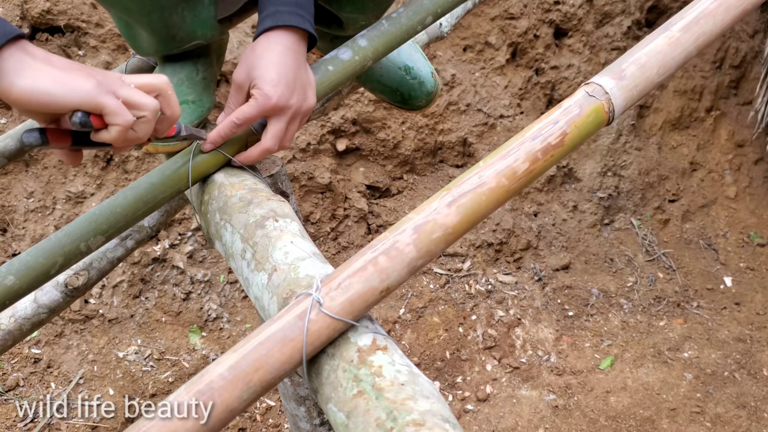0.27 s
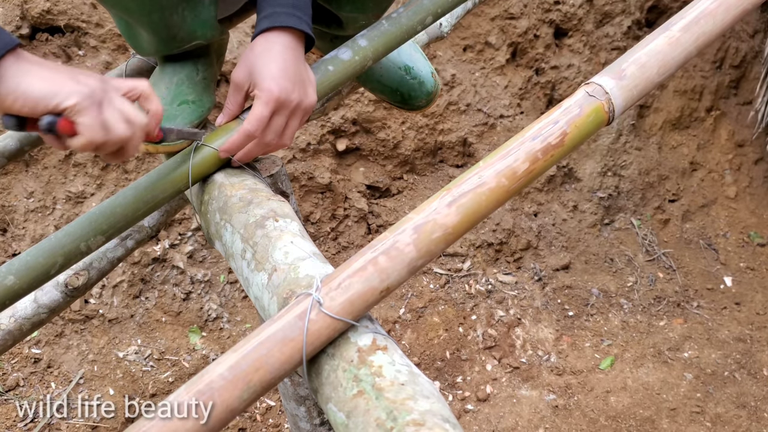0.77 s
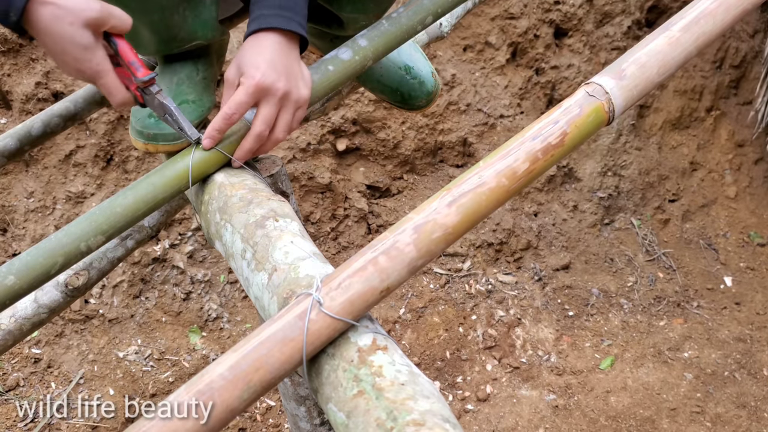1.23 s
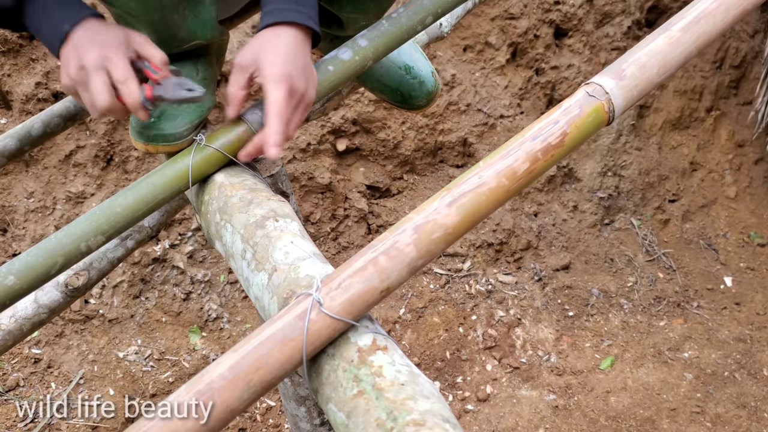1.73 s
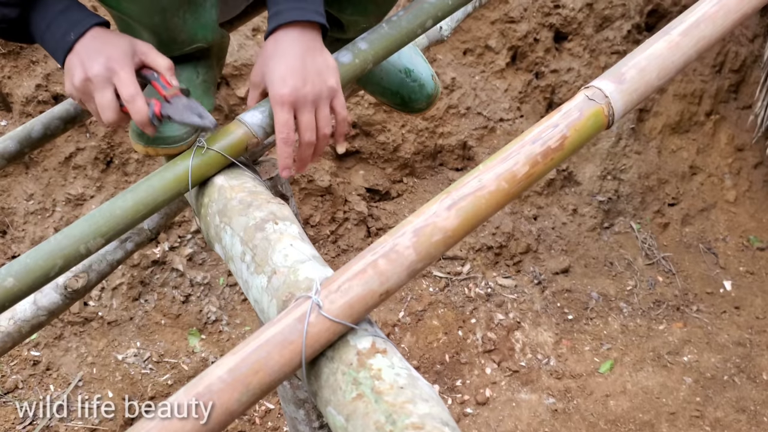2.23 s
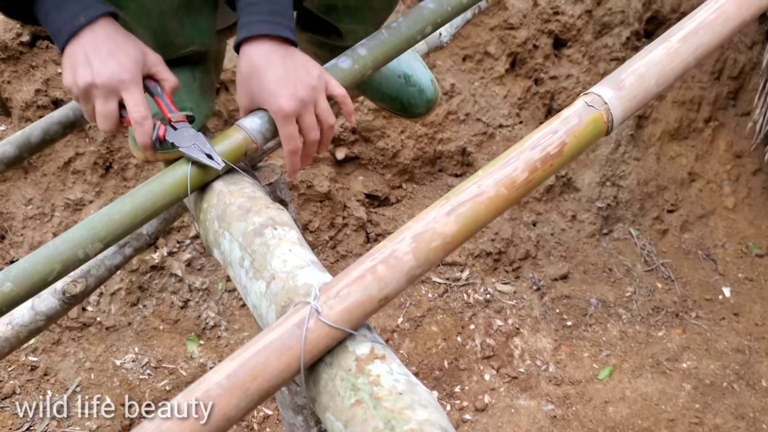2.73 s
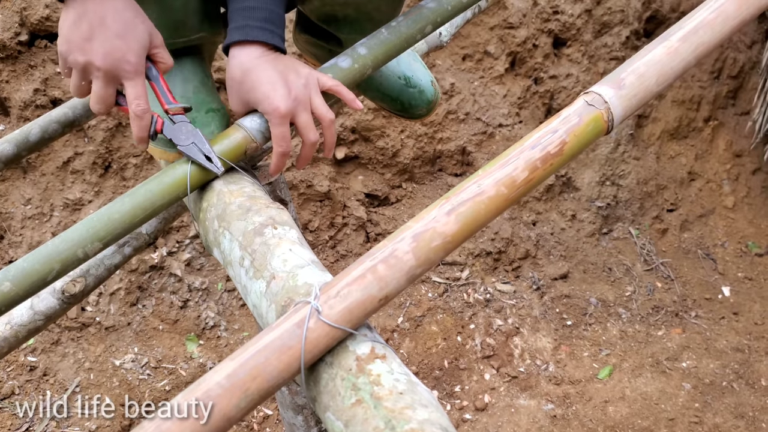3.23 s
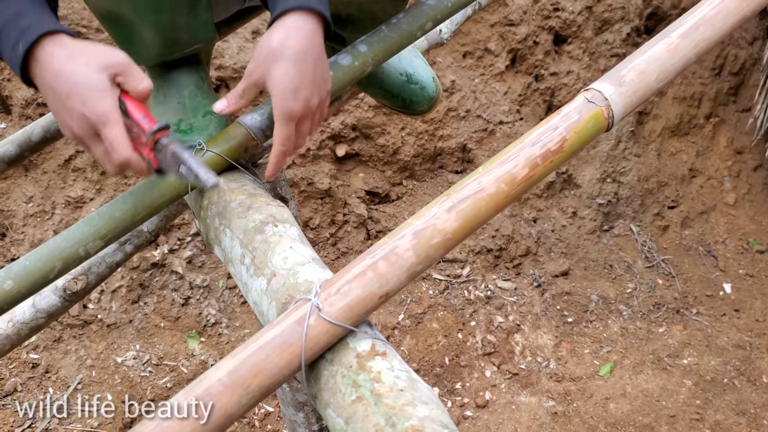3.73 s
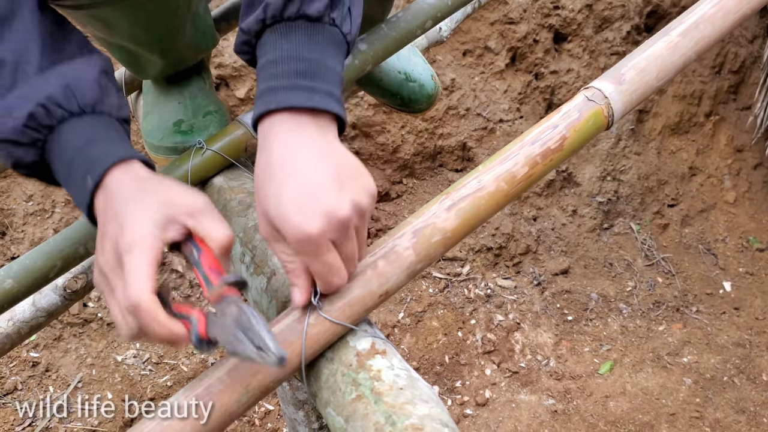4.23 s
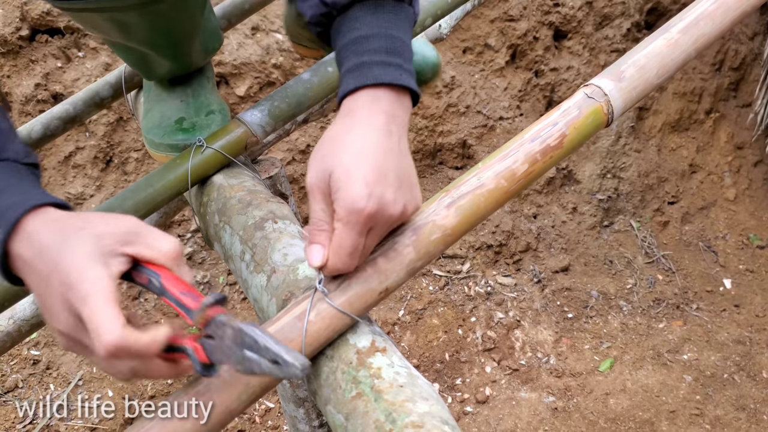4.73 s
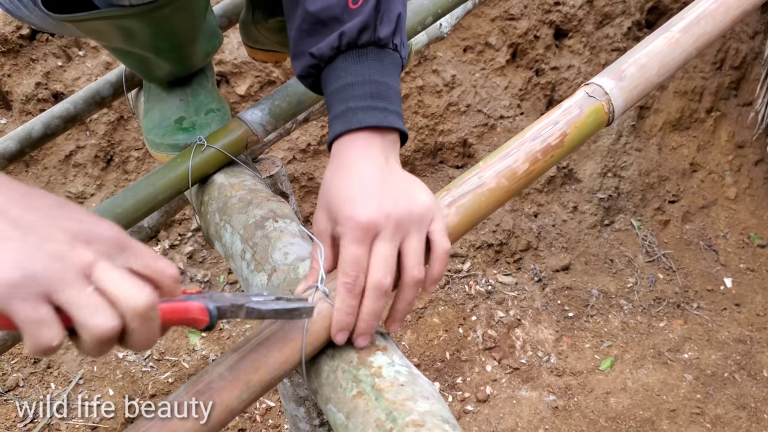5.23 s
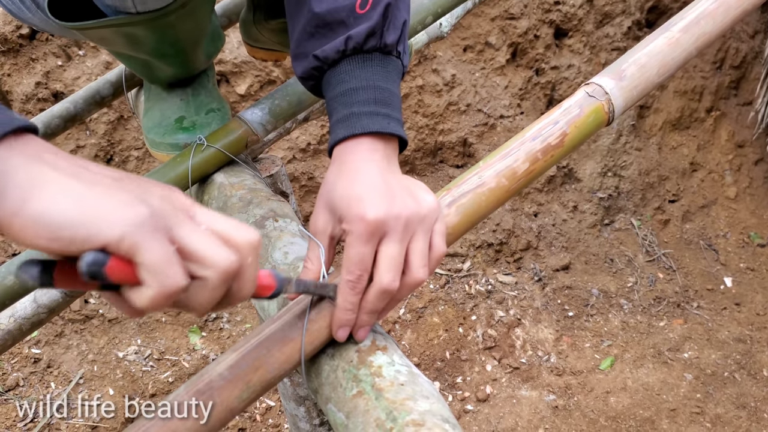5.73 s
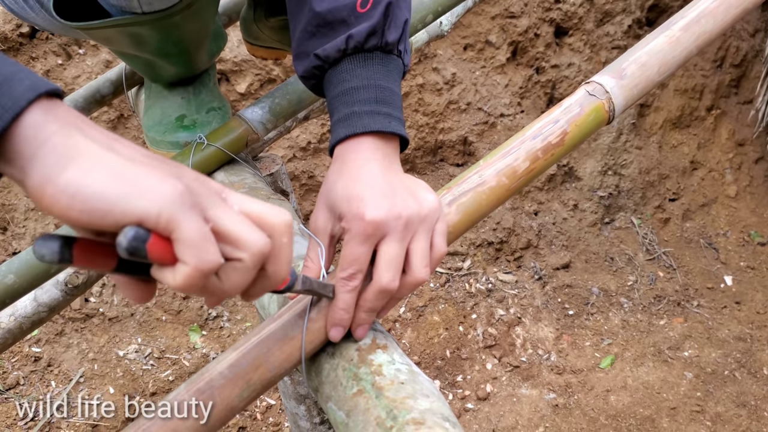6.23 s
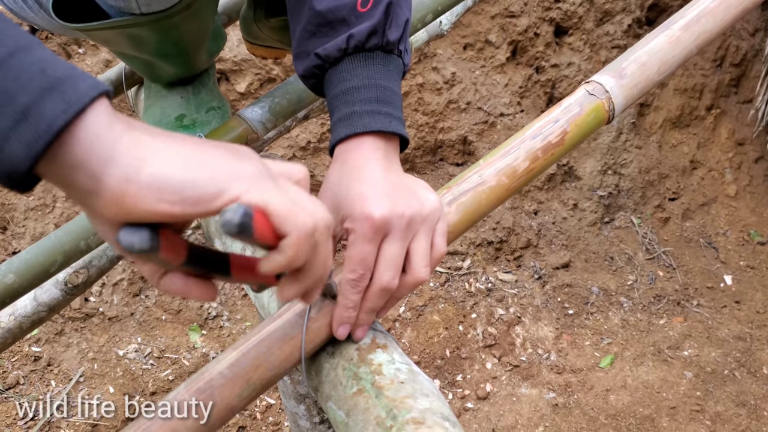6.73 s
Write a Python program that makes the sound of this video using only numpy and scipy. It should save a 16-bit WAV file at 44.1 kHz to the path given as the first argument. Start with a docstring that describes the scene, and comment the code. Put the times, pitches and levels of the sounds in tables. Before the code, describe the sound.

Close outdoor work with pliers on bamboo. Faint wire ticks and dry scrapes lead to four loud, sharp steel taps with a hollow cane clack and a short slap off an earth bank. Afterwards come much quieter knocks, clicks and stuttering wire rasps on a hand-damped pole. Small birds whistle far off over a very soft leafy wash, picked up by a close stereo microphone.

```python
"""Pliers on a bamboo lashing

Pliers tap a twisted wire end flat against a bamboo pole four times, then grip and twist the next lashing.
Each hit is chattering noise through steel resonances, decaying cane and pole modes, and two bank echoes.
Softer wire clicks and tocks fall between; scrapes are noise gated by random stick-slip pulses.
Small birds chirp far off as sliding sines in a quiet forest of filtered noise.
A light breeze, low resonant noise, nudges the microphone."""
import sys
import numpy as np
from scipy import signal
from scipy.fft import rfft, irfft
from scipy.io import wavfile
from scipy.ndimage import uniform_filter1d

SR = 44100
rng = np.random.default_rng(int(sys.argv[2]) if len(sys.argv) > 2 else 0)


def dump(signal):
    """Clip the signal to [-1, 1] and save it as 16-bit WAV at the path in sys.argv[1]."""
    limited = np.clip(np.atleast_2d(signal).T, -1, 1)
    pcm = np.round(limited * 32767).astype(np.int16)
    wavfile.write(sys.argv[1], SR, pcm)


N = 308259
AGE_S = np.arange(SR // 2) / SR  # time since a contact


def undb(db):
    """Decibels to gain."""
    return 10 ** (np.asarray(db) / 20)


def unit(x):
    """Scale to rms 1."""
    return x / np.sqrt(np.mean(x ** 2))


def unit_hit(x):
    """Scale to the energy of 20 ms at rms 1."""
    return x / np.sqrt(np.mean(x ** 2) * x.shape[-1] / (SR / 50))


def fade(t60_s):
    """Exponential decay by 60 dB in t60_s."""
    return np.exp(-np.log(1000) * AGE_S / t60_s)


def noise(size, alike):
    """Two noises with a given correlation."""
    mid, side = rng.standard_normal((2, size))
    alike = np.clip(alike, -1, 1)
    shared = np.sqrt((1 + alike) / 2) * mid
    return shared + np.sqrt((1 - alike) / 2) * np.array([side, -side])


def colour(x, points):
    """Causal minimum-phase filter through (frequency [Hz], gain [dB]) points."""
    hz, db = np.transpose(points)
    grid_hz = np.linspace(1, SR / 2, 1025)
    gain_db = np.interp(np.log(grid_hz), np.log(hz), db)
    cepstrum = irfft(np.log(undb(gain_db)))
    half = len(grid_hz) - 1
    folded = np.r_[cepstrum[0], 2 * cepstrum[1:half], np.zeros(half)]
    impulse = irfft(np.exp(rfft(folded)))
    return signal.fftconvolve(x, impulse[None], axes=1)[:, :x.shape[1]]


def resonate(x, hz, width_hz):
    """One resonance."""
    return signal.lfilter(*signal.iirpeak(hz, hz / width_hz, fs=SR), x)


def low_pass(x, order, top_hz):
    """Butterworth low-pass."""
    return signal.sosfilt(signal.butter(order, top_hz, fs=SR, output="sos"), x)


def ring(modes, scatter_db, spread_rad):
    """Decaying modes; each contact point excites them differently, and each reaches the sides out of step."""
    hz, db, t60_s = np.transpose(modes)[:, :, None]
    size, phase_cycles, skew, detune = rng.standard_normal((4, len(modes), 1))
    level = undb(db + scatter_db * size) * fade(t60_s)
    cycles = hz * (1 + 0.0063 * detune) * AGE_S + phase_cycles
    waves = level * np.exp(2j * np.pi * cycles)
    return np.array([(waves * np.exp(1j * side * spread_rad * skew)).imag.sum(0) for side in (1, -1)])


def add(out, s, x):
    """Mix x in at time s."""
    i = max(int(s * SR), 0)
    out[:, i:i + x.shape[1]] += x[:, :out.shape[1] - i]


def pan(db):
    """Left and right gains for a level difference."""
    return undb(np.array([[db], [-db]]) / 2)


def sprinkle(per_s, db, scatter_db):
    """Loosely spaced random events: rows of (time [s], level [dB], normal draw for pitch)."""
    slot, size, pitch = rng.random(100), *rng.standard_normal((2, 100))
    rows = np.c_[(np.arange(len(slot)) + slot) / per_s, db + scatter_db * size, pitch]
    return rows[rows[:, 0] < N / SR]


# hard taps on the wire end: (time [s], level [dB], steel ring [Hz], crack [dB])
HARD_TAPS = [(1.89, -27.5, 3300, 1.5), (2.1476, -27, 3130, -0.5), (2.526, -23, 2995, -7),
             (2.7496, -27.5, 2930, -1.5)]
# hollow cane wall, ringing freely: (frequency [Hz], mean level [dB], t60 [s])
FREE_WALL = [(632, -4, .13), (675, -4, .11), (753, -1, .14), (831, 0, .11), (955, -5, .11), (1042, 1, .12),
             (1133, 1, .1), (1250, -6, .09), (1444, -9, .14)]
# pliers bump the held pole: (time [s], level [dB], pole boom [dB])
POLE_KNOCKS = [(3.02, -53.5, -1.5), (3.2921, -45.5, 4), (3.3293, -33, -16.5), (4.1713, -56.5, -25),
               (4.8818, -54, 6), (5.36, -50.5, -3), (5.389, -55, 4.5), (5.8261, -51, -10),
               (5.956, -41, -0.5), (5.968, -44, 5.5), (6.097, -47, -13), (6.588, -47.5, -0.5)]
# wire snaps on the jaws; free length sets pitch: (time [s], level [dB], steel ring [Hz], crack [dB])
WIRE_TICKS = [(.846, -54, 2020, -24), (1.137, -57, 1750, -23), (1.502, -45.5, 3220, -13),
              (2.247, -46, 2430, -3), (3.334, -41.5, 1220, -7), (3.614, -49, 1330, -1),
              (4.983, -56, 2100, -14), (5.496, -53.5, 1940, -19), (5.570, -54.5, 2820, -22),
              (6.097, -50, 4800, -4), (6.131, -56.5, 2840, -4), (6.587, -54, 3680, -26)]
# cane wall under a pressing hand: (frequency [Hz], level [dB], t60 before the hand's fade [s])
HAND_HELD_WALL = [(666, 7, 0.12), (769.3, 5, 0.13), (820, -0.5, 0.13), (1228, 7.5, 0.033)]


def pliers():
    """Hard taps ring freely; in the light knocks and ticks a hand steadies and damps the pole."""
    out = np.zeros((2, N))
    for s, db, steel_hz, crack_db in HARD_TAPS:
        tap = contact(db, -2, -4.5, steel_hz, -12, crack_db, FREE_WALL,
                      rise_s=0.0029, chatter_s=0.0052, scatter_db=-4, scatter_t60_s=0.1,
                      cane_t60_s=0.14, dense_db=2, steel_width_hz=61, swell_s=0.0083,
                      pan_db=4.5, echo_db=-19, boom_top_hz=770)
        add(out, s, tap)
    # closed jaws in every knock; little of a tick reaches the pole
    knocks = [(s, db, boom_db, 0, 1725, -9, -16) for s, db, boom_db in POLE_KNOCKS]
    ticks = [(s, db, -18, -7.5, hz, 0, crack_db) for s, db, hz, crack_db in WIRE_TICKS]
    hand = fade(.55)
    for s, *levels in knocks + ticks:
        click = contact(*levels, HAND_HELD_WALL,
                        rise_s=0.0011, chatter_s=0.0039, scatter_db=-2.5, scatter_t60_s=0.072,
                        cane_t60_s=0.11, dense_db=-2.0, steel_width_hz=190, swell_s=0.0017,
                        pan_db=0.0, echo_db=-21, boom_top_hz=273)
        add(out, s, hand * click)
    return out


# crack of steel on wire: (frequency [Hz], filter gain [dB])
STEEL_CRACK = [(100, 6.5), (600, -11.5), (1200, -8.5), (2000, -4), (3400, 4.5), (4600, -1.5), (6300, 0.5),
               (8500, -1.5), (11000, -1), (15000, -4.5), (16500, -1.5)]
# dense cane overtones: (frequency [Hz], filter gain [dB])
CANE_OVERTONES = [(150, -59), (400, -6), (700, -6), (1250, -1.5), (1600, -6.5), (2200, -11), (3400, -12),
                  (4500, -22), (8000, -59), (16000, -68)]


def contact(db, boom_db, clack_db, steel_hz, steel_db, crack_db, wall, rise_s, chatter_s, scatter_db,
            scatter_t60_s, cane_t60_s, dense_db, steel_width_hz, swell_s, pan_db, echo_db, boom_top_hz):
    """Steel chatters on wire for a few ms; the jaws ring briefly, the cane clacks and the poles boom on."""
    push = np.minimum(AGE_S / rise_s, 1) ** 2 / (1 + (AGE_S / chatter_s) ** 6)
    swell = 1 - np.exp(-AGE_S / swell_s)
    # scatter off rough soil: duller, from all round
    scatter = resonate(noise(len(AGE_S), 0) * swell * fade(scatter_t60_s), 2500, 10600)
    blow = noise(len(AGE_S), 0) * push * pan(pan_db) + undb(scatter_db) * scatter
    crack = outdoors(colour(blow, STEEL_CRACK), echo_db)
    # the two jaws ring a little apart
    jaw = resonate(blow, steel_hz, steel_width_hz)
    other_jaw = resonate(blow, 1.167 * steel_hz, 2 * steel_width_hz)
    steel = resonate(jaw + undb(-11.5) * other_jaw, steel_hz, steel_hz / 2)
    steel = outdoors(steel, echo_db)
    dense = colour(noise(len(AGE_S), 0.11) * fade(cane_t60_s), CANE_OVERTONES)
    clack = swell * (unit_hit(ring(wall, 2.5, .55)) + undb(dense_db) * unit_hit(dense))
    poles = swell * boom(boom_top_hz)
    parts = ((boom_db, poles), (clack_db, clack), (steel_db, steel), (crack_db, crack))
    return undb(db) * sum(undb(part_db) * unit_hit(part) for part_db, part in parts)


# lashed poles: (frequency [Hz], mean level [dB], t60 [s])
POLE_MODES = [(72, -14, .28), (103, -2, .34), (139, -3, .33), (183, -5, .33), (209, -6, .3), (242, -10, .3),
              (288, -2, .35), (349, -5, .17), (384, 0, .2), (440, -5, .19), (468, -9, .2), (507, -2, .22),
              (545, -7, .27), (574, -5, .19)]


def boom(top_hz, rattle_db=-11, rattle_t60_s=0.31, rock_db=-8, rock_hz=100, rock_s=0.044, pan_db=-2.5):
    """The poles ring, rattle in their lashings and, a little later, rock on the log below."""
    rattle = resonate(noise(len(AGE_S), 0.92) * fade(rattle_t60_s), 477, 230)
    rock = resonate(resonate(noise(len(AGE_S), 0), rock_hz, 79), rock_hz, 87)
    rock = rock * AGE_S * np.exp(-AGE_S / rock_s)
    frame = unit_hit(ring(POLE_MODES, 1.77, 0.99))
    frame = frame + undb(rattle_db) * unit_hit(rattle) + undb(rock_db) * unit_hit(rock)
    return pan(pan_db) * low_pass(frame, 3, top_hz)


def outdoors(x, echo_db, bank_s=.0195, far_s=0.034, far_db=-11):
    """Earth bank and ground beyond: first echo even on both sides, fainter second with sides swapped."""
    out = x.copy()
    add(out, bank_s, undb(echo_db) * (x + x[::-1]) / np.sqrt(2))
    add(out, far_s, undb(echo_db + far_db) * x[::-1])
    return out


# clearest soft tocks: (time [s], level [dB])
CLEAR_TOCKS = [(.842, -62.5), (1.442, -60.5), (1.706, -58), (3.897, -61.5), (4.018, -58.5), (4.983, -58),
               (5.525, -64)]


def tocks(hz=545, t60_s=0.048, knock_db=1, knock_hz=500):
    """A soft knock of a cycle or two and a short hollow ring; fainter ones fall at random."""
    out = np.zeros((2, N))
    faint = sprinkle(per_s=2.5, db=-70, scatter_db=3)[:, :2]
    for s, db in [*CLEAR_TOCKS, *faint]:
        hollow = ring([(hz, 0, t60_s), (670, -8, t60_s)], 1.7, 0.34) * np.minimum(AGE_S / .002, 1)
        knock = ring([(knock_hz, 0, .007)], 1, 0.63) * np.minimum(AGE_S / 0.0017, 1)
        add(out, s, undb(db) * (unit_hit(hollow) + undb(knock_db) * unit_hit(knock)))
    return out


# wire dragged over cane and jaws: (start [s], end [s], rasp level [dB])
STROKES = [(0.687, 0.969, -72.5), (1.395, 1.562, -73.5), (3.278, 3.364, -61), (3.501, 3.62, -67),
           (3.624, 4.1, -69.5), (4.413, 4.58, -56), (4.765, 4.818, -67.5), (4.83, 5.199, -68.5),
           (5.21, 5.48, -71), (5.459, 5.64, -65.5), (5.801, 5.885, -63), (5.91, 5.959, -62),
           (6.01, 6.135, -58.5)]
# rasp of the drag: (frequency [Hz], filter gain [dB])
RASP_COLOUR = [(300, -3), (900, 0.5), (1800, 8.5), (3000, 5.5), (4500, 5), (7000, -8), (16000, -42.5)]
# hiss of the drag: (frequency [Hz], filter gain [dB])
HISS_COLOUR = [(1500, -5.5), (4500, -1), (7000, -0.5), (10000, -4.5), (14500, -8.5), (16500, -16.5)]
USUAL_STROKE_DB, USUAL_HISS_DB, USUAL_CANE_DB = -63, -1.5, -2.5  # hiss and cane relative to rasp
# [dB per dB of effort]: louder strokes hiss more and shake the cane less, relative to the rasp
HISS_GROWTH, CANE_GROWTH = 0.26, -0.094


def scrapes(slips_per_s=800, slip_db=4.3, tick_t60_s=.004, drag_t60_s=.05, drag_db=-8):
    """Wire sticks and slips: each slip ticks, drags and shakes the cane; every stroke swells and fades."""
    out = np.zeros((2, N))
    for start_s, end_s, rasp_db in STROKES:
        effort_db = rasp_db - USUAL_STROKE_DB
        hiss_db = rasp_db + USUAL_HISS_DB + HISS_GROWTH * effort_db
        cane_db = rasp_db + USUAL_CANE_DB + CANE_GROWTH * effort_db
        size = int(np.clip(end_s - start_s, .01, 1) * SR)
        strength = undb(slip_db * rng.standard_normal(SR).clip(-2, 1.4))
        slips = (rng.random(SR) < slips_per_s / SR) * strength
        slip = fade(tick_t60_s) + undb(drag_db) * fade(drag_t60_s)
        # slip powers add
        grip = np.sqrt(signal.fftconvolve(slips ** 2, slip ** 2)[:SR].clip(0))
        rub = (noise(SR, 0.017) * grip)[:, -size:] * np.sqrt(np.hanning(size))
        rub = np.pad(rub, ((0, 0), (0, SR // 20)))  # room for the ring-out
        cane = sum(undb(db) * resonate(rub, hz, 24) for hz, db, _ in HAND_HELD_WALL)
        cane = cane + undb(-7.5) * resonate(rub, 540, 300)
        rasp = undb(rasp_db) * unit(colour(rub, RASP_COLOUR))
        hiss = undb(hiss_db) * unit(colour(rub, HISS_COLOUR))
        add(out, start_s, rasp + hiss + undb(cane_db) * unit(cane))
    return out


# a bird's falling slurs: (time [s], top pitch before waver [Hz], level before tree blur [dB])
BIRD_SLURS = [(.072, 2360, -64.5), (.480, 2090, -61.5), (1.668, 2280, -56.5), (2.959, 2284, -64.5),
              (3.755, 2260, -59), (3.978, 2290, -59.5)]
# its short contact notes: (time [s], top pitch before waver [Hz], level before tree blur [dB])
BIRD_PIPS = [(1.618, 2190, -61), (1.791, 2210, -60), (1.966, 2420, -60.5), (2.703, 2220, -62.5),
             (2.855, 2225, -56.5), (4.372, 2160, -61), (6.0, 2270, -58), (6.2, 2280, -63),
             (6.637, 2230, -62.5), (6.925, 2220, -60)]
# a second bird's low whistle: (time [s], top pitch before waver [Hz], level before tree blur [dB])
LOW_WHISTLES = [(1.444, 1596, -62.5), (1.533, 1510, -63), (3.652, 1387, -65)]
# length [s], share of the pitch lost
SLUR_S, SLUR_FALL = 0.076, .24
PIP_S, PIP_FALL = 0.0284, 0.052
WHISTLE_S, WHISTLE_FALL = 0.063, 0.014
FAR_S, FAR_FALL = 0.0562, 0.109
FAR_HZ, FAR_SPREAD = 2354, 0.0597  # mean top pitch, relative deviation


def birds(trees_db=-1, trees_t60_s=0.11, waver=0.028):
    """Short sine whistles arch over and slide down, the low ones barely; the trees blur them."""
    notes = [(s, SLUR_S, hz, SLUR_FALL, db) for s, hz, db in BIRD_SLURS]
    notes += [(s, PIP_S, hz, PIP_FALL, db) for s, hz, db in BIRD_PIPS]
    notes += [(s, WHISTLE_S, hz, WHISTLE_FALL, db) for s, hz, db in LOW_WHISTLES]
    # farther birds of the first kind; only the top of their slurs carries
    for s, db, pitch in sprinkle(per_s=6, db=-70.5, scatter_db=1.5):
        notes.append((s, FAR_S, FAR_HZ * (1 + FAR_SPREAD * pitch), FAR_FALL, db))
    out = np.zeros((2, N))
    for s, length_s, top_hz, fall, db in notes:
        u = np.linspace(0, 1, int(length_s * SR))
        wobble = unit(uniform_filter1d(rng.standard_normal(SR // 4), size=200))[:len(u)]
        # highest at 1/8 of the note, lowest from 3/4 on
        slide = (1 - np.cos(np.pi * (1.6 * u - .2).clip(None, 1))) / 2
        hz = top_hz * (1 - fall * slide) * (1 + waver * wobble)
        side_phase = np.array([[0], [rng.normal(0, 0.11)]])
        phase = 2 * np.pi * np.cumsum(hz) / SR + side_phase
        add(out, s, undb(db) * unit(np.sin(np.pi * u) * np.sin(phase)))
    trees = noise(len(AGE_S), 0.57) * fade(trees_t60_s)
    trees /= np.sqrt(np.sum(trees ** 2) / 2)
    return out + undb(trees_db) * signal.fftconvolve(out, trees, axes=1)[:, :N]


# breeze on the microphone: (time [s], length [s], right-side level [dB])
BREEZE_PUFFS = [(0, 0.2, -69), (0.42, 0.078, -42), (0.71, 0.87, -77.5)]


def breeze(eddy_hz=58, eddy_width_hz=35, left_db=-12, top_hz=170):
    """Slow eddies, low resonant noise, press mostly on the right microphone port."""
    out = np.zeros((2, N))
    for s, length_s, db in BREEZE_PUFFS:
        size = int(length_s * SR)
        eddies = resonate(noise(2 * SR, 0.51), eddy_hz, eddy_width_hz)
        eddies = resonate(eddies, eddy_hz, eddy_width_hz)[:, -size:]
        eddies = low_pass(eddies * np.hanning(size), 4, top_hz)
        eddies = np.array([unit(port) for port in eddies])
        add(out, s, eddies * undb([[db + left_db], [db]]))
    return out


# distant leaves: (frequency [Hz], filter gain [dB])
LEAF_COLOUR = [(40, -13), (100, -11), (200, -5), (450, -2.5), (650, -1.5), (1080, -8.5), (1500, 0),
               (2100, -4), (2800, -5.5), (4000, -9), (5000, -15.5), (8000, -19.5), (11000, -23.5),
               (15000, -21.5)]


def forest(level_db=-59.5, alike=0.04, flutter_db=-0.16):
    """A soft wash of distant leaves, filtered noise in four bands that waver on their own."""
    wash = colour(noise(N, alike), LEAF_COLOUR)
    below = [signal.sosfiltfilt(signal.butter(2, hz, fs=SR, output="sos"), wash)
             for hz in (300, 1000, 2500)]
    bands = np.diff([0 * wash, *below, wash], axis=0)
    steps = np.linspace(0, N, 70)
    out = np.zeros((2, N))
    for band in bands:
        flutter = np.interp(np.arange(N), steps, rng.standard_normal(len(steps)))
        out += band * undb(flutter_db * flutter)
    return undb(level_db) * unit(out)


def scene():
    """The work in front, the forest behind."""
    return pliers() + tocks() + scrapes() + birds() + breeze() + forest()


def record(dry, top_hz=15800):
    """The recorder cuts the top with a steep elliptic low-pass."""
    return signal.sosfilt(signal.ellip(10, .2, 70, top_hz, fs=SR, output="sos"), dry)


dry = scene()
out = record(dry)
dump(out)
```